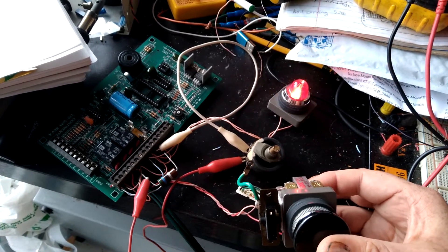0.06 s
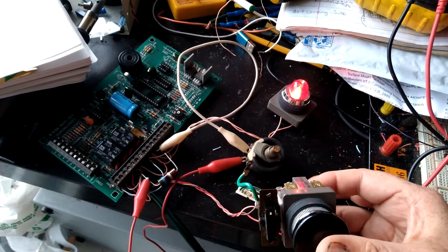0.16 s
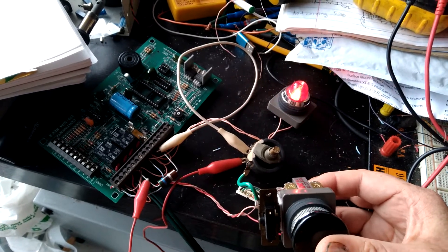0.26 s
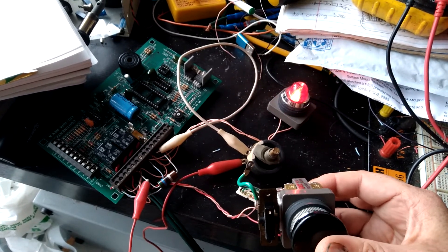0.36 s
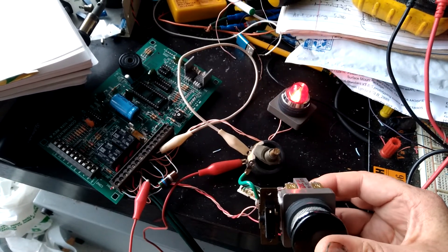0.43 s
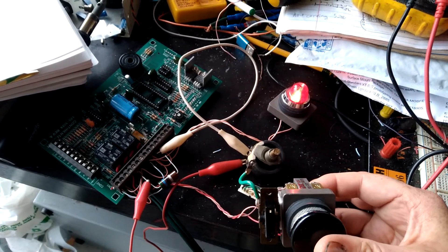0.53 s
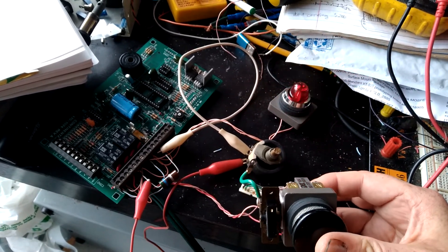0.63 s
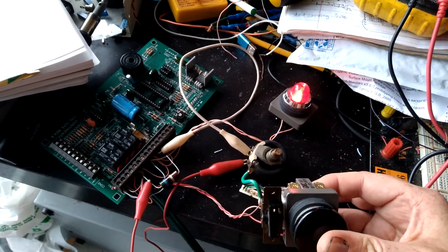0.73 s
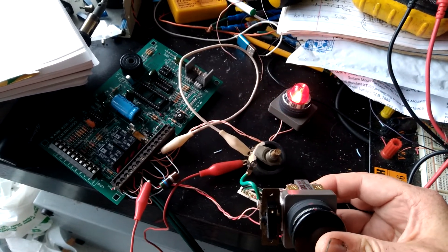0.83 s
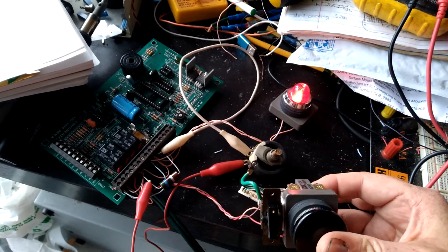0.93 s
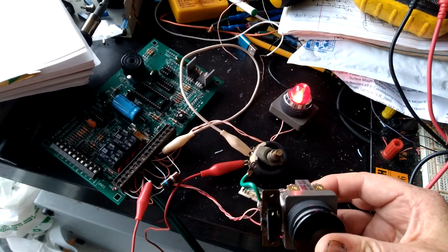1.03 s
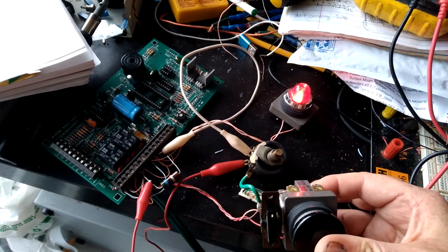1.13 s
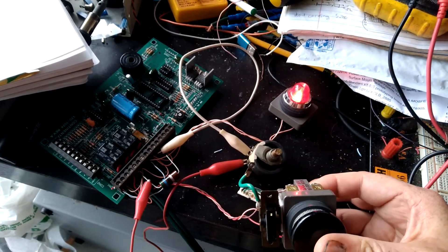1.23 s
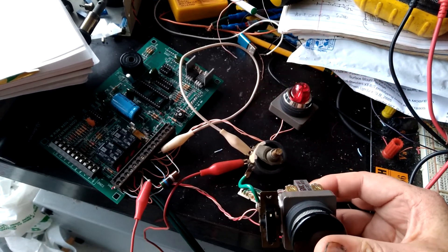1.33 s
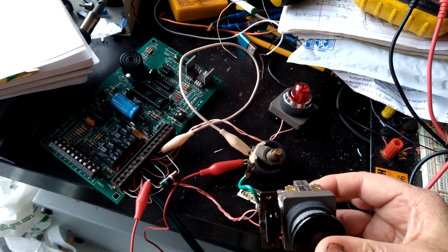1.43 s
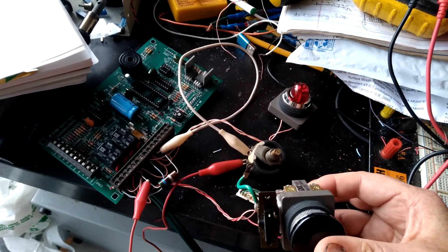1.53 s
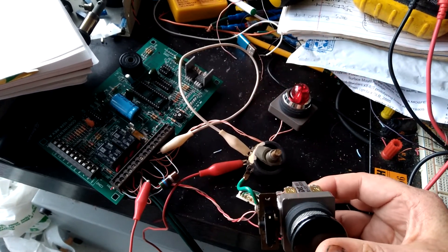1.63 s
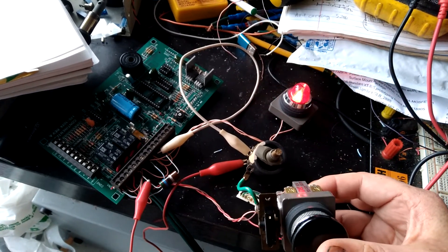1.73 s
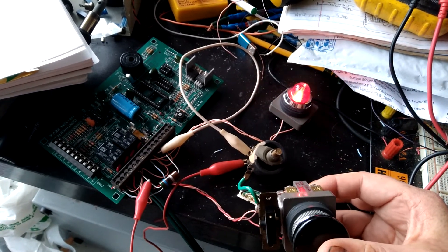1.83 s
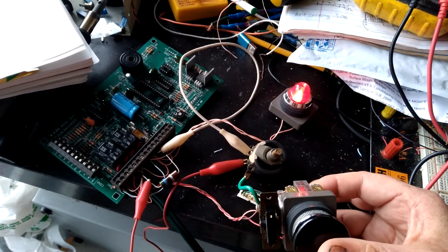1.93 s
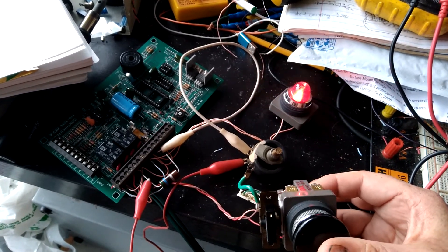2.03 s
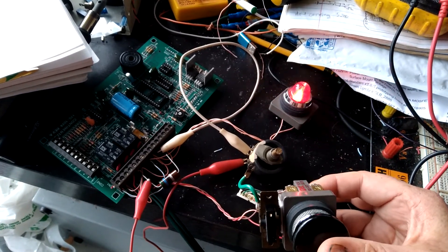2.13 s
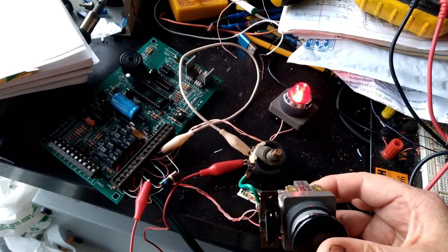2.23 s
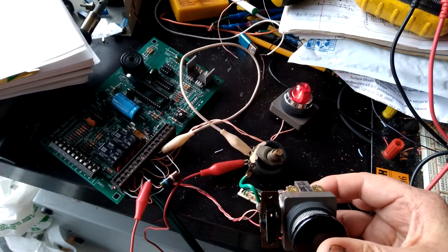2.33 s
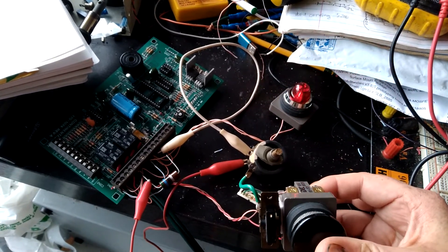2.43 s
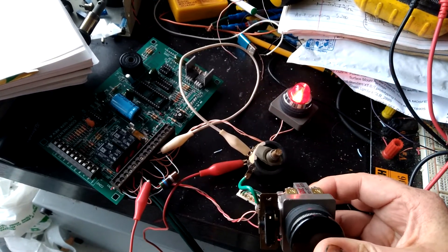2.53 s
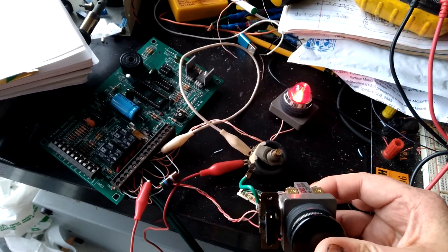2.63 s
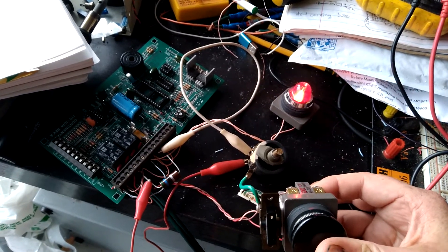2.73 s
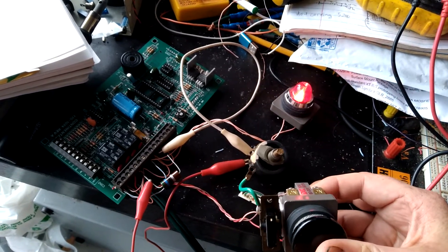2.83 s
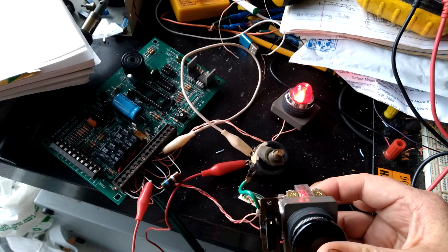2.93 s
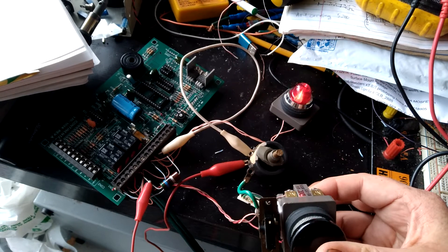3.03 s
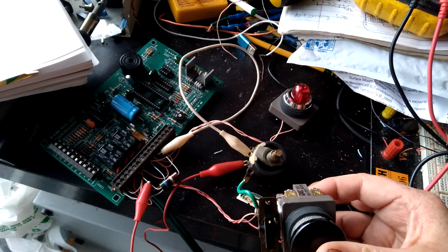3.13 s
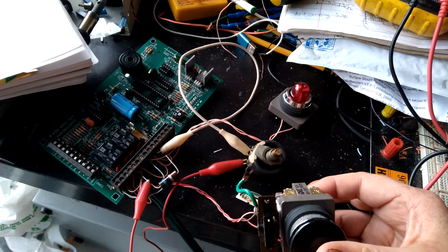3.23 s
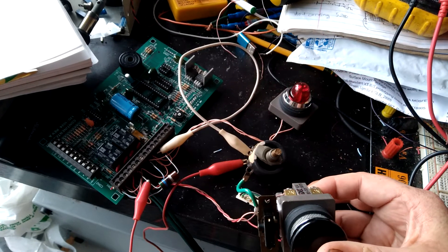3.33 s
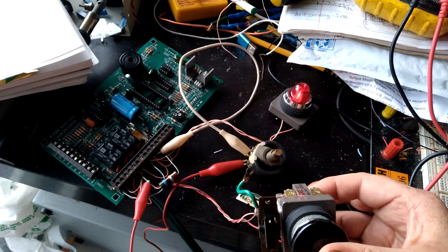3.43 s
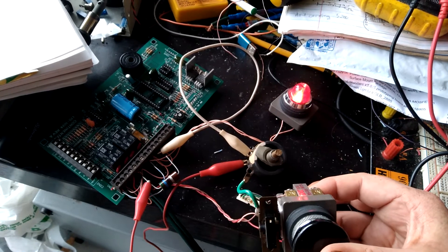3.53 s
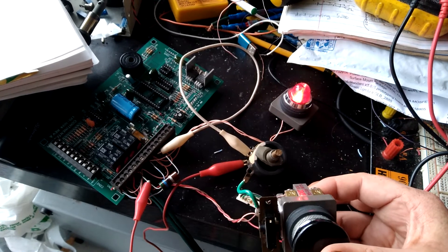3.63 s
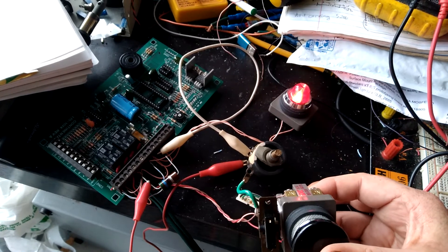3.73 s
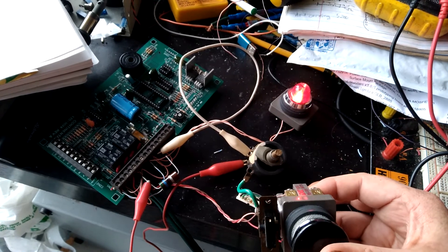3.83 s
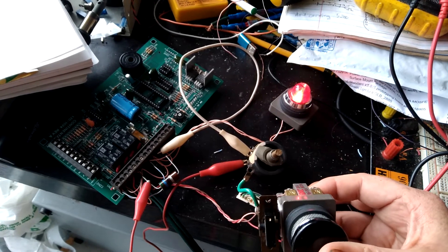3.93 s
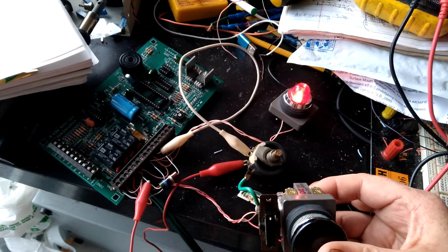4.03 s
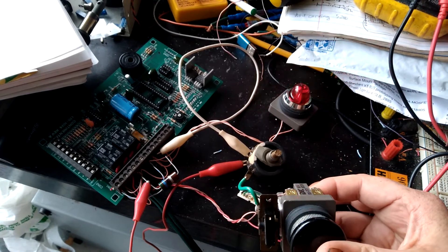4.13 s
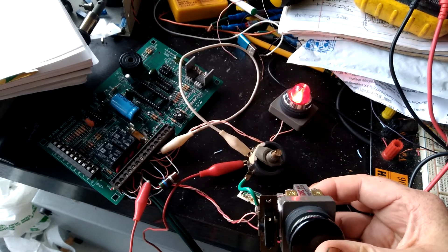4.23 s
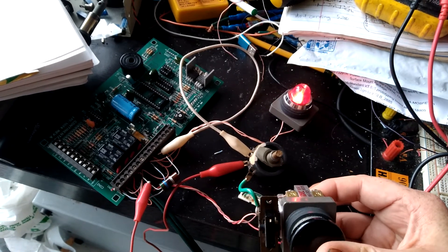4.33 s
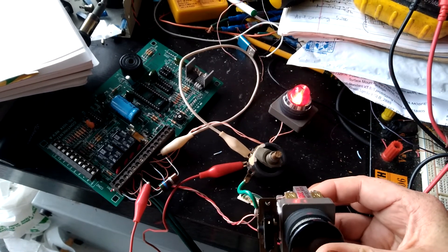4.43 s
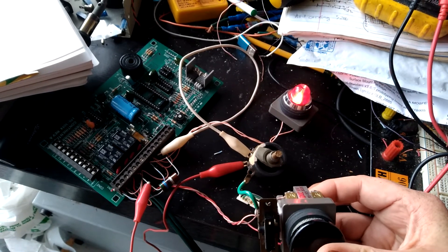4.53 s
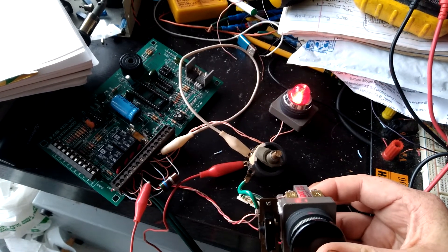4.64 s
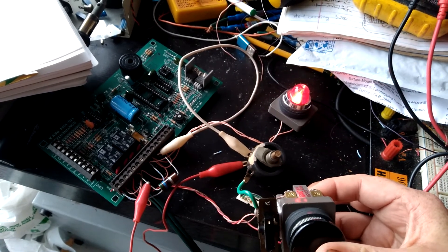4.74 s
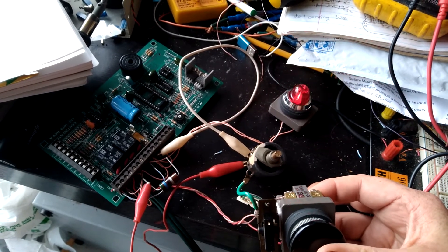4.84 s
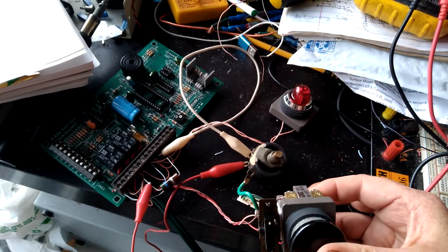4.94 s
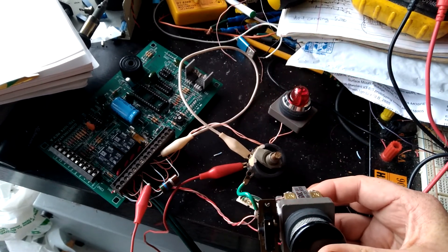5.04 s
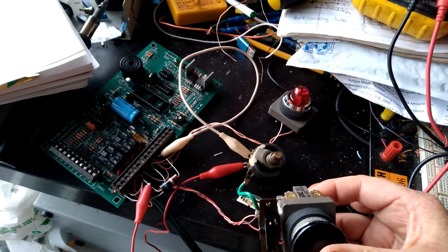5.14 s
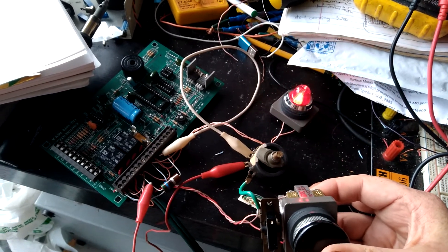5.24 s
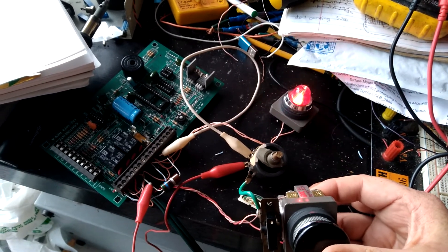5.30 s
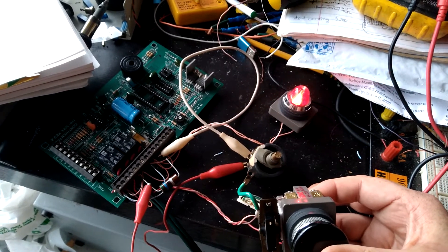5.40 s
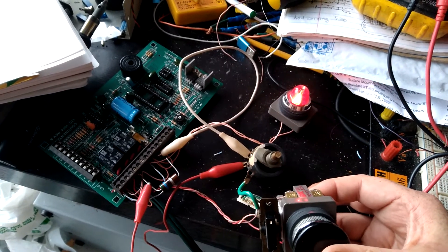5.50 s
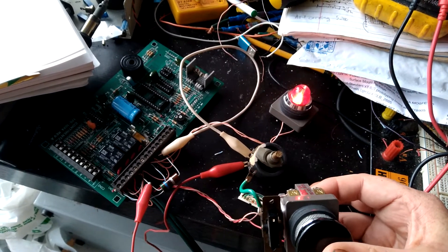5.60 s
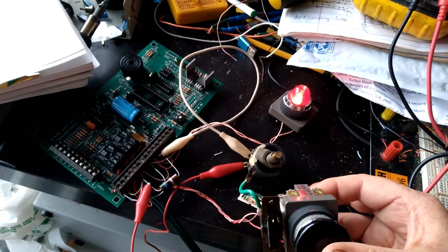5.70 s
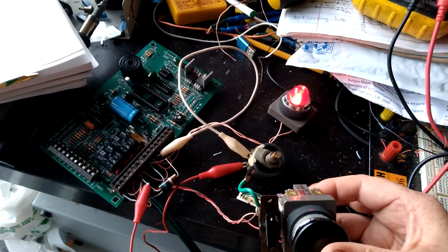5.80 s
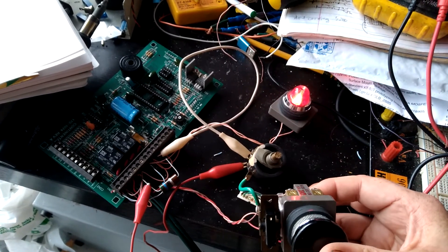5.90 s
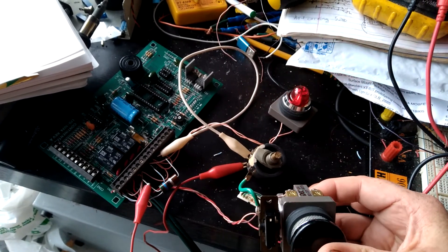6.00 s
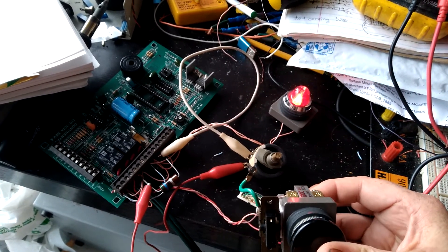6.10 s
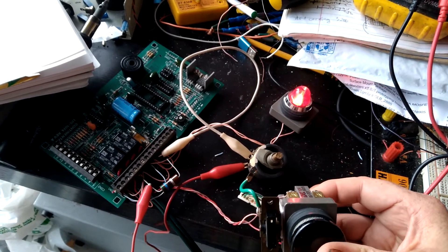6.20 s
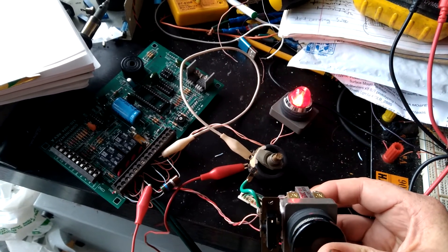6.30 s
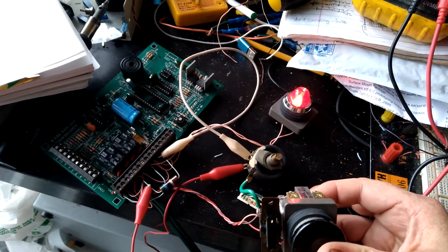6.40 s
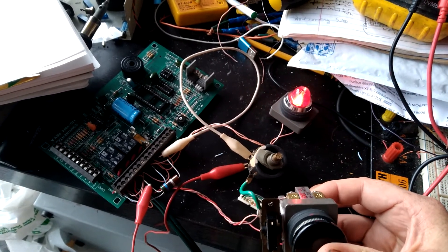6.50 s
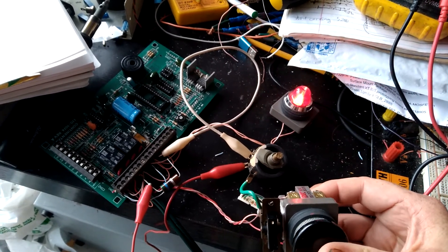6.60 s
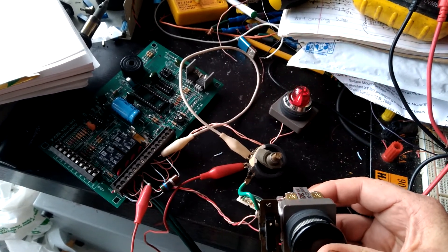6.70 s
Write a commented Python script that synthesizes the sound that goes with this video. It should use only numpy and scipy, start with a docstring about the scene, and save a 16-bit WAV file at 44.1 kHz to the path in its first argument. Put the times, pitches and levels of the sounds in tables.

```python
"""Pushbutton and relay on a workbench.

A finger presses a button and its sprung contact block snaps over. On each release a relay
pulls in or drops out, its armature striking a stop with a sharper click. The clicks echo off
bench and room. Underneath: mains hum, rumble, ticks of the handled switch and faint sparrows."""
import sys
import numpy as np
from scipy import signal
from scipy.fft import rfft, irfft
from scipy.io import wavfile
from scipy.ndimage import uniform_filter1d, minimum_filter1d

SR = 44100
rng = np.random.default_rng(int(sys.argv[2]) if len(sys.argv) > 2 else 0)


def unload_audio(sound):
    """Save the sound as a 16-bit wav file, at the path given as the first command line argument."""
    columns = np.transpose(np.atleast_2d(sound))
    # keep every value between -1 and 1, then stretch to whole-number steps
    steps = np.round(np.clip(columns, -1, 1) * 32767)
    wavfile.write(sys.argv[1], SR, steps.astype(np.int16))


N = 298116


def amp(db):
    """Decibels to gain."""
    return 10 ** (np.asarray(db) / 20)


def unit_rms(x):
    """Scales to rms 1."""
    return x / np.sqrt(np.mean(x ** 2) + 1e-20)


def curve(points, hz):
    """Interpolates (frequency, value) points on a log-frequency axis."""
    f, value = np.transpose(points)
    return np.interp(np.log(hz + 1), np.log(f + 1), value)


def add(mix, time_s, sound):
    """Mixes a sound in at time_s."""
    part = mix[..., max(round(time_s * SR), 0):][..., :sound.shape[-1]]
    part += sound[..., :part.shape[-1]]


def wander(size, rate_hz):
    """Smooth random drift, rms about 1, up to about rate_hz."""
    hz = np.fft.rfftfreq(N, 1 / SR)
    return unit_rms(irfft(rfft(rng.standard_normal(N)) / (1 + (hz / rate_hz) ** 2) ** 2, N))[:size]


# (frequency [Hz], level [dB])
HUM_TONES = [(119.8, -68), (208, -79), (297, -84.5), (392, -91.5)]


def mains_hum():
    """Bench equipment hums, each tone wavering in level and phase."""
    t, hum = np.arange(N) / SR, np.zeros(N)
    for hz, db in HUM_TONES:
        level = 1 + 0.23 * wander(N, rate_hz=16)
        phase = 2 * np.pi * hz * t + 0.49 * wander(N, rate_hz=6.9)
        hum += amp(db) * unit_rms(level * np.sin(phase))
    return hum * amp([[-1], [1]])


# (frequency [Hz], relative density [dB])
NOISE_SPECTRUM = [(20, -35.5), (40, -16.5), (65, 0.5), (100, -3), (135, 1.5), (170, -7), (240, -9),
                  (340, -17), (560, -18.5), (850, -17.5), (1600, -25.5), (3500, -34.5), (9500, -35.5),
                  (15500, -40.5)]
# (frequency [Hz], left-right correlation [ratio])
NOISE_CORRELATION = [(30, 1), (150, 0.9), (300, .8), (600, 0), (1200, 0), (16000, 0.33)]
# (frequency [Hz], left re right [dB])
NOISE_BALANCE = [(60, -1.5), (110, -3), (200, -0.5), (380, 4.5), (700, 1), (1290, -2), (2380, -0.5),
                 (4400, -1), (8120, -1), (15000, -2.5)]


def room_noise():
    """Steady rumble, alike on both sides, and a diffuse hiss."""
    hz = np.fft.rfftfreq(N, 1 / SR)
    left, independent = rfft(rng.standard_normal((2, N)))
    correlation, balance_db = curve(NOISE_CORRELATION, hz), curve(NOISE_BALANCE, hz)
    right = correlation * left + np.sqrt(1 - correlation ** 2) * independent
    spectra = np.array([left * amp(balance_db / 2), right * amp(-balance_db / 2)])
    return amp(-66.5) * unit_rms(irfft(spectra * amp(curve(NOISE_SPECTRUM, hz)), N))


def background(swell_below_hz=250, whine_hz=9800, whine_width_hz=350):
    """Hum and room noise, the lows swelling at random, plus a thin whine."""
    hz = np.fft.rfftfreq(N, 1 / SR)
    steady = mains_hum() + room_noise()
    lows = irfft(rfft(steady) / (1 + (hz / swell_below_hz) ** 4), N)
    whine_band = 1 / (1 + (2 * (hz - whine_hz) / whine_width_hz) ** 2)
    whine = unit_rms(irfft(rfft(rng.standard_normal((2, N))) * whine_band, N))
    swell = amp(2.83 * wander(N, rate_hz=4.9))
    return steady + lows * (swell - 1) + amp(-91) * whine


# (frequency [Hz], relative gain [dB])
ECHO_COLOUR = [(200, 2), (850, 7), (2000, 12.5), (3200, 3.5), (5000, 1), (7000, -2), (10500, -8.5),
               (13300, -2.5), (15500, 1.5)]


def echoes(x, t60_curve, rise_s):
    """Dense stereo reflections, each band decaying at its own rate."""
    hz, t, noise = signal.stft(rng.standard_normal((2, SR)), SR, nperseg=256)
    decay_db = curve(ECHO_COLOUR, hz)[:, None] - 60 * t / curve(t60_curve, hz)[:, None]
    tail = signal.istft(noise * amp(decay_db), SR, nperseg=256)[1]
    tail *= 1 - np.exp(-(np.arange(tail.shape[1]) / SR / rise_s) ** 2)
    return signal.fftconvolve(x[None], tail / np.linalg.norm(tail[0]), axes=1)[:, :N]


def bird_note(length_s, start_hz, glide, bend, partials):
    """A note gliding by the fraction glide; pitch jitter makes it rasp."""
    progress = np.linspace(0, 1, round(length_s * SR))
    jitter = 0.043 * wander(len(progress), rate_hz=1500)
    pitch_hz = start_hz * (1 + glide * progress ** bend) * (1 + jitter)
    phase = 2 * np.pi * np.cumsum(pitch_hz) / SR
    tone = sum(amp(db) * np.sin(multiple * phase) for multiple, db in partials)
    return unit_rms(tone * signal.windows.tukey(len(tone), 0.5))


# (time [s], level [dB], nominal pitch [Hz])
SPARROW_WHISTLES = [(0.455, -68, 4870), (1.21, -72.5, 5010), (1.372, -65.5, 5100), (1.968, -71.5, 4900),
                    (2.024, -75.5, 4300), (3.597, -67.5, 4950), (4.723, -74, 4850), (5.785, -64.5, 4750)]
# (time [s], level [dB])
SPARROW_CHIRPS = [(1.073, -66.5), (2.209, -63.5), (5.612, -66.5)]
# (delay [s], length [s], start pitch [Hz], level [dB])
NOTES_PER_CHIRP = [(0, .075, 4605, 0.5), (.068, .05, 3538, -0.5)]
# (pitch multiple [ratio], level [dB])
NOTE_PARTIALS = [(1, 0), (1.5, -4), (2, -2.5), (3, -15)]
# (frequency [Hz], echo T60 [s])
SPARROW_T60 = [(3000, 0.67), (10000, 0.2)]


def sparrows():
    """Distant falling whistles and rising two-note chirps, heard mostly as echoes."""
    song = np.zeros(N)
    for time_s, db, nominal_hz in SPARROW_WHISTLES:
        whistle = bird_note(0.052, 0.93 * nominal_hz, glide=-0.29, bend=2.1, partials=[(1, 0)])
        add(song, time_s, amp(db) * whistle)
    for time_s, db in SPARROW_CHIRPS:
        for delay_s, length_s, start_hz, note_db in NOTES_PER_CHIRP:
            note = bird_note(length_s, start_hz, glide=0.097, bend=1, partials=NOTE_PARTIALS)
            add(song, time_s + delay_s, amp(db + note_db) * note)
    return amp(-9.5) * song + amp(-2.5) * echoes(song, SPARROW_T60, rise_s=0.0018)


# (frequency [Hz], left re right [dB])
LEFT_SHADE = [(300, -3), (2000, -3), (5000, -5), (9500, -5), (12000, -4.5), (14500, -1.5)]


def body(colour, modes=(), size=4096):
    """Minimum-phase impulse responses of an object: left, right, into the room."""
    hz = np.fft.rfftfreq(size, 1 / SR)
    colour_db, peaks_db = curve(colour, hz), np.zeros(len(hz))
    for mode_hz, width_hz, db in modes:
        peaks_db += db / (1 + (2 * (hz - mode_hz) / width_hz) ** 2)
    blurred_db = uniform_filter1d(peaks_db, size=90)
    right_db = colour_db + peaks_db
    left_db = colour_db + 0.71 * peaks_db + 0.12 * blurred_db + curve(LEFT_SHADE, hz)
    # summed over all directions, modes blur and the colour flattens
    room_db = colour_db + 0.12 * peaks_db + blurred_db
    room_db += 0.14 * (room_db.max() - room_db)
    level_db = np.array([left_db, right_db, room_db])
    log_gain = np.log(amp(np.hstack([level_db, level_db[:, -2:0:-1]])))
    return np.fft.ifft(np.exp(signal.hilbert(log_gain).conj())).real


def chatter(envelope):
    """A rattle of tiny impacts under an envelope, with a nearly flat spectrum."""
    rattle = envelope * rng.standard_normal(len(envelope))
    for _ in range(2):
        spectrum = rfft(rattle)
        whitened = irfft(spectrum / (abs(spectrum) + 1e-12), len(rattle))
        rattle = whitened * (envelope / envelope.max()) ** 0.25
    return rattle / np.linalg.norm(rattle)


def impact(ring, contact_s, bounce_s, bounce_db, size=1024):
    """A strike and its bounce ring a body; the left arrives later, partly scattered."""
    t = np.arange(size) / SR
    strike, bounce = t / contact_s, np.maximum(t - bounce_s, 0) / contact_s
    pulses = strike * np.exp(-strike) + amp(bounce_db) * bounce * np.exp(-bounce)
    direct = chatter(pulses + amp(-27.5) * np.exp(-t / 0.0047))
    scattered = chatter((1 - np.exp(-strike)) * np.exp(-t / 0.002))
    left = np.interp(t - 10 / SR, t, 0.7 * (direct + scattered), left=0)
    sound = signal.fftconvolve(np.array([left, direct, direct]), ring, axes=1)
    return sound / np.linalg.norm(sound[:2])


# (time [s], level [dB])
GRIP_TICKS = [(0.4342, -51), (1.2267, -51.5), (1.5736, -56.5), (2.199, -48), (3.1489, -42.5),
              (3.1898, -41.5), (3.2488, -50.5), (3.9384, -43), (3.9868, -51), (5.1369, -51.5),
              (5.8477, -49.5), (5.9037, -49), (6.633, -45)]
# (frequency [Hz], relative gain [dB])
GRIP_COLOUR = [(200, -23.5), (1500, -12.5), (3500, -11), (6000, -1.5), (8500, 1), (10500, -11.5),
               (15000, -21.5)]


def handling(faint_per_s=2.5):
    """The switch housing ticks as the grip shifts: clear ticks among faint random ones."""
    out, ring = np.zeros((3, N)), body(GRIP_COLOUR)
    draws = rng.random((round(faint_per_s * N / SR), 2))
    faint = [(when * N / SR, -67 + 8 * force) for when, force in draws]
    for time_s, db in list(GRIP_TICKS) + faint:
        tick = impact(ring, contact_s=0.00069, bounce_s=0.0023, bounce_db=-6)
        add(out, time_s, amp(db + 15.5) * tick)
    return out * amp([[0], [0], [4]])  # the hand deflects sound into the room


def strokes(events, snap, touch, ring, lead_in_s, lead_in_db):
    """A light first touch and a faint noise swelling into the snap against the stop."""
    out = np.zeros((3, N))
    t = np.arange(-SR // 100, 0) / SR  # 10 ms before the snap
    for time_s, db, touch_db, lead_s in events:
        add(out, time_s, amp(db) * snap)
        add(out, time_s - lead_s, amp(db + touch_db) * touch)
        lead_in_noise = np.exp(t / lead_in_s) * rng.standard_normal((3, len(t)))
        lead_in = signal.fftconvolve(lead_in_noise, ring, axes=1)
        add(out, time_s + t[0], amp(db + lead_in_db) * lead_in / np.linalg.norm(lead_in[:2]))
    return out


# (time [s], level [dB], plunger touch re snap [dB], touch lead [s])
BUTTON_PRESSES = [(0.5823, -19.5, -33, .009), (1.3103, -17.5, -19, 0.008), (2.3505, -17.5, -37.5, 0.019),
                  (3.0622, -21, -39, .011), (4.0865, -19.5, -42, 0.016), (4.8408, -21, -45, 0.0047),
                  (5.9861, -19, -34, 0.012), (6.6955, -18.5, -23.5, 0.01)]
# (frequency [Hz], relative gain [dB])
BUTTON_COLOUR = [(100, -22), (400, -25.5), (1100, -30.5), (2300, -23), (3200, -15), (4000, -5),
                 (5900, -5.5), (7700, -1.5), (10500, -3.5), (12200, -5.5), (13100, -12), (15500, -10.5)]
# button and contact block: (frequency [Hz], width [Hz], height [dB])
BLOCK_MODES = [(1480, 130, 5.5), (1950, 140, 8), (2690, 170, 15.5), (3420, 110, 13.5), (3850, 130, 6),
               (4240, 200, 7.5), (4670, 180, 3.5), (4860, 380, 10.5), (5210, 79, 6), (6540, 260, 14.5),
               (6660, 520, 8.5), (8240, 120, 9.5), (8670, 200, 13), (8900, 67, 13), (9510, 510, 12.5),
               (9850, 470, 7), (10500, 440, 11), (11650, 360, 10.5), (14400, 200, 6.5), (14850, 160, 3.5),
               (15300, 250, 3.5)]
# (frequency [Hz], level [dB], T60 [s])
HOUSING_MODES = [(296, -71.5, .25), (393, -67.5, 0.36), (809, -69.5, 0.13), (868, -65.5, 0.19)]


def button():
    """The sprung contact block snaps over, rattles and rings the hollow housing."""
    ring = body(BUTTON_COLOUR, BLOCK_MODES)
    t = np.arange(SR // 4) / SR
    housing = sum(amp(db - 60 * t / t60_s) * np.sin(2 * np.pi * hz * t)
                  for hz, db, t60_s in HOUSING_MODES)
    snap = np.outer([1, 1, 0], housing)
    add(snap, 0, impact(ring, contact_s=0.00081, bounce_s=0.0031, bounce_db=-14.5))
    touch = impact(ring, contact_s=0.0011, bounce_s=0.011, bounce_db=-4)
    presses = strokes(BUTTON_PRESSES, snap, touch, ring, lead_in_s=0.002, lead_in_db=-18.5)
    return amp(17.5) * presses * amp([[0], [0], [1.5]])  # the hand deflects sound into the room


# (time [s], level [dB], touch lead [s])
RELAY_PULL_INS = [(0.722, -5, 0.02), (2.4793, -4, 0.019), (4.2321, -5.5, 0.022), (6.1132, -4, 0.021)]
# (time [s], level [dB])
RELAY_DROP_OUTS = [(1.7457, -12), (3.506, -10.5), (5.2657, -11.5)]
# relay frame and cover: (frequency [Hz], width [Hz], height [dB])
FRAME_MODES = [(1324, 52, 5.5), (1825, 100, 12.5), (2450, 64, 12), (3420, 83, 8.5), (4763, 200, 18.5),
               (5110, 130, 11), (7330, 170, 10), (8220, 260, 6), (8600, 250, 4.5), (9160, 220, 7.5),
               (9660, 200, 3.5), (10280, 240, 10), (11026, 247, 15), (11600, 490, 5)]
# armature's first touch, core strike, back-stop strike: (frequency [Hz], relative gain [dB])
TOUCH_COLOUR = [(200, -21.5), (2000, -22), (4500, 0.5), (9500, 4.5), (12500, -9.5), (15500, -3)]
CORE_COLOUR = [(100, -33), (400, -32), (1100, -33.5), (2300, -26.5), (3200, -15.5), (4200, -12.5),
               (6400, -9), (7600, -1.5), (10500, 4.5), (12200, -0.5), (13300, -9.5), (15500, -11.5)]
BACK_STOP_COLOUR = [(100, -50.5), (400, -29.5), (1100, -34.5), (2700, -24.5), (4000, -10.5), (6400, -11.5),
                    (8000, -7), (9100, 6.5), (12200, -1.5), (13500, -13), (15500, -6.5)]


def relay(pull_touch_db=-28.5, drop_touch_db=-22.5, drop_lead_s=0.0027):
    """The armature hits the core when pulled in and its back stop when let go."""
    touch = impact(body(TOUCH_COLOUR), contact_s=0.0008, bounce_s=0.002, bounce_db=-4)

    core = body(CORE_COLOUR, FRAME_MODES)
    core_snap = impact(core, contact_s=0.00054, bounce_s=0.0017, bounce_db=-10)
    pulls = [(time_s, db, pull_touch_db, lead_s) for time_s, db, lead_s in RELAY_PULL_INS]
    pull_in = strokes(pulls, core_snap, touch, core, lead_in_s=0.0095, lead_in_db=-21)

    stop = body(BACK_STOP_COLOUR, FRAME_MODES)
    stop_snap = impact(stop, contact_s=0.00037, bounce_s=0.0019, bounce_db=-10)
    drops = [(time_s, db, drop_touch_db, drop_lead_s) for time_s, db in RELAY_DROP_OUTS]
    drop_out = strokes(drops, stop_snap, touch, stop, lead_in_s=0.0029, lead_in_db=-24)
    return amp(15.5) * pull_in + amp(18) * drop_out


# bench and shelves, then the room beyond: (frequency [Hz], T60 [s])
BENCH_T60 = [(300, .25), (1500, 0.098), (5000, 0.097), (10000, 0.16), (15000, .11)]
ROOM_T60 = [(300, .5), (5000, .65), (10000, 0.67), (15000, .45)]


def scene():
    """Close clicks and their echoes over sparrows and background."""
    left, right, outward = button() + relay() + handling()
    bench = amp([[-14], [-12]]) * echoes(outward, BENCH_T60, rise_s=0.0056)
    room = amp(-31) * echoes(outward, ROOM_T60, rise_s=0.041)
    return np.array([left, right]) + bench + room + sparrows() + background()


def record(dry, ceiling=0.93, cutoff_hz=15900):
    """Fast peak limiter, then a low-pass."""
    needed_gain = np.minimum(1, ceiling / (abs(dry).max(0) + 1e-9))
    gain = uniform_filter1d(minimum_filter1d(needed_gain, size=31), size=31)
    lowpass = signal.firwin(201, cutoff_hz, window=("kaiser", 8), fs=SR)
    return signal.oaconvolve(dry * gain, lowpass[None], "same")


dry = scene()
out = record(dry)
unload_audio(out)
```